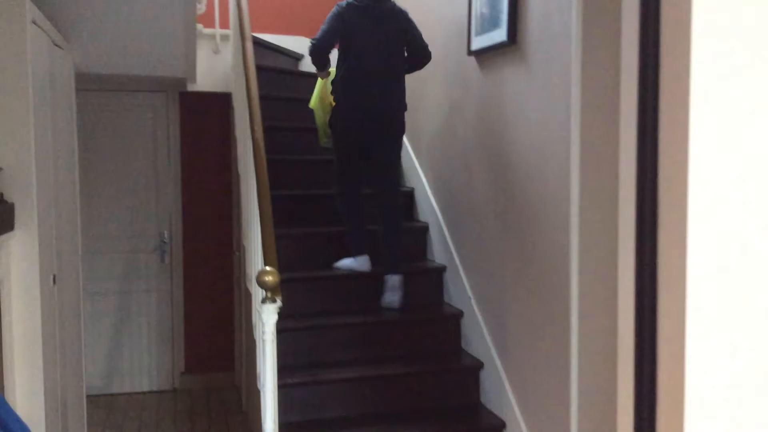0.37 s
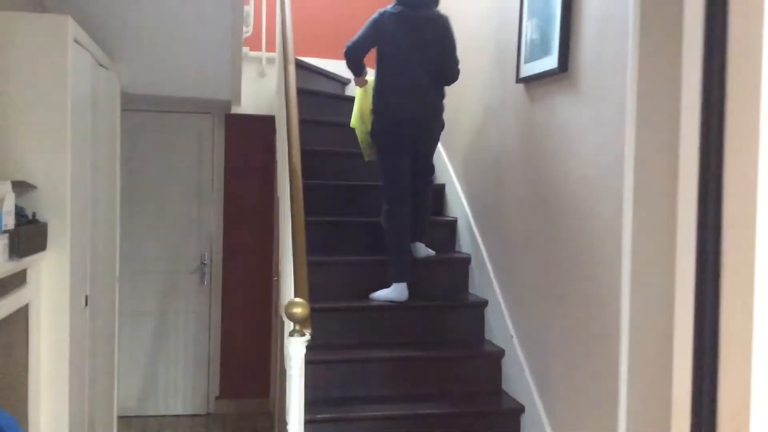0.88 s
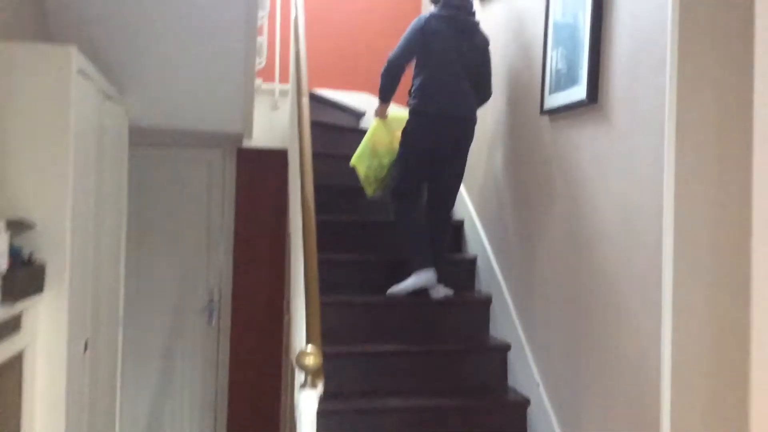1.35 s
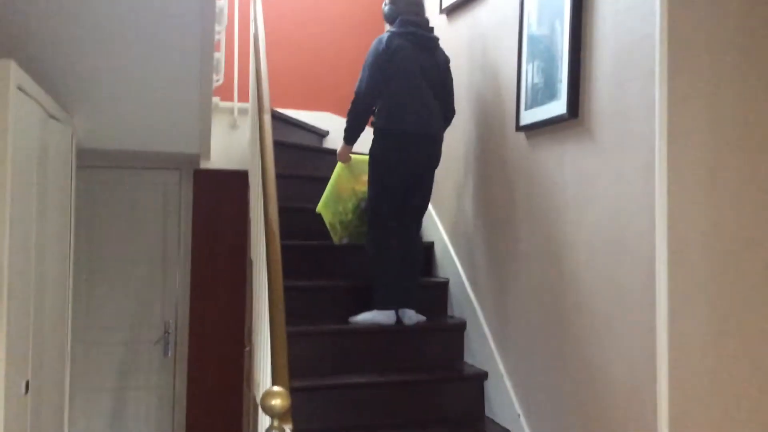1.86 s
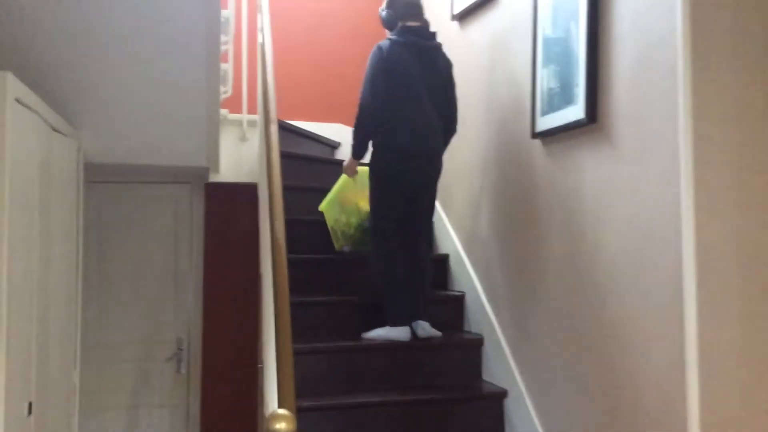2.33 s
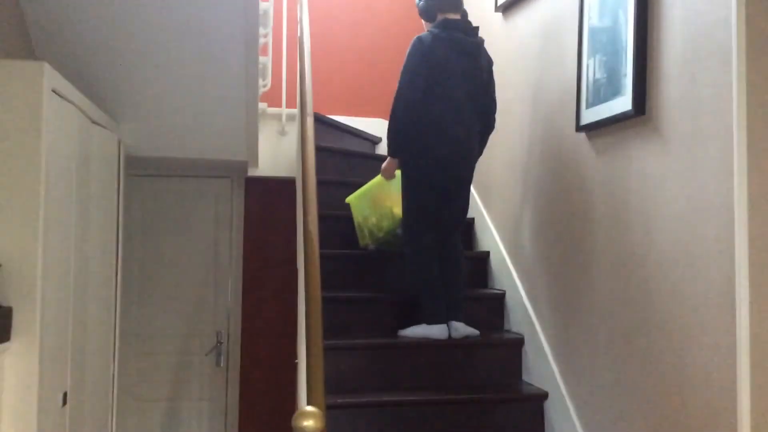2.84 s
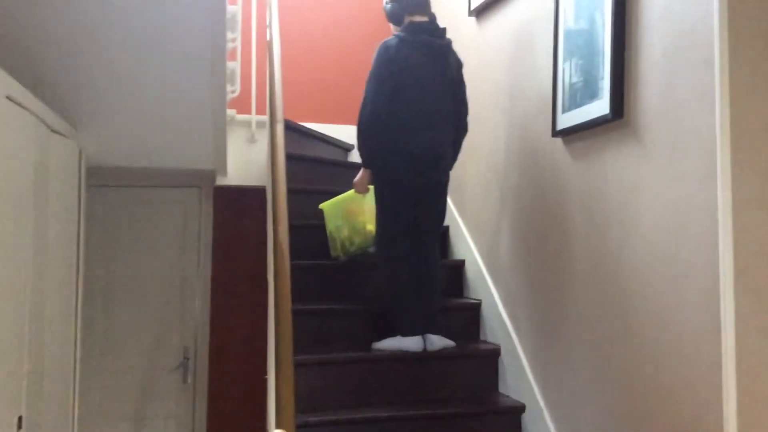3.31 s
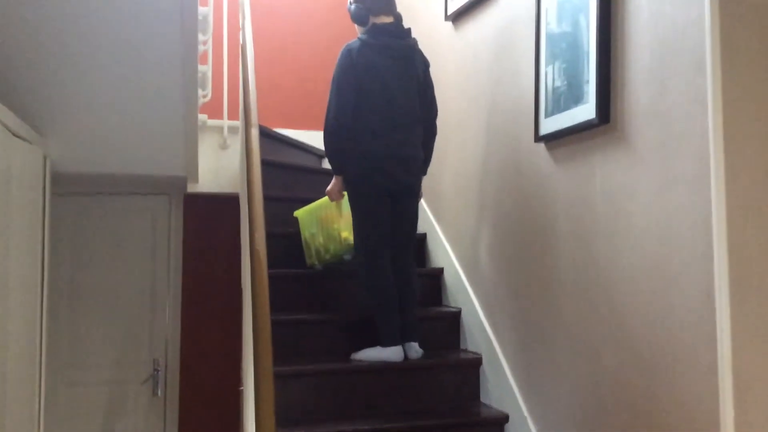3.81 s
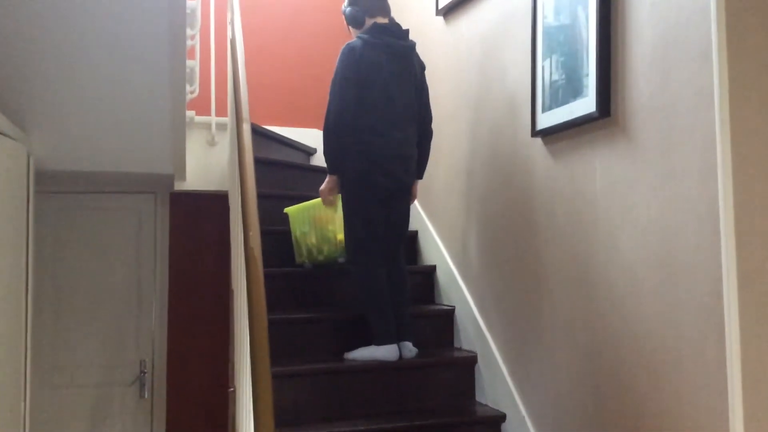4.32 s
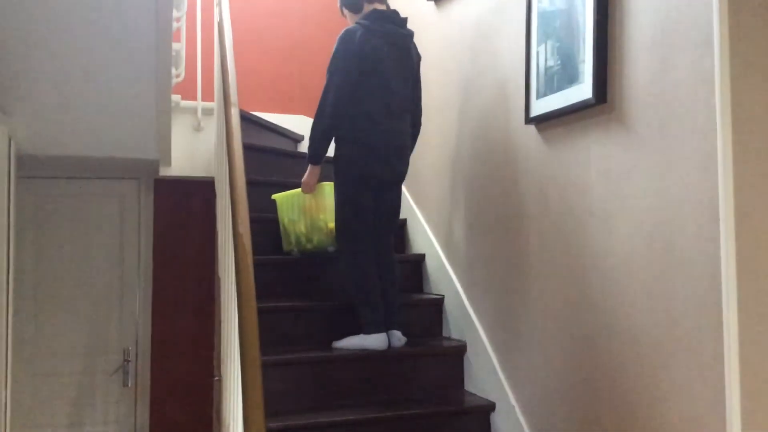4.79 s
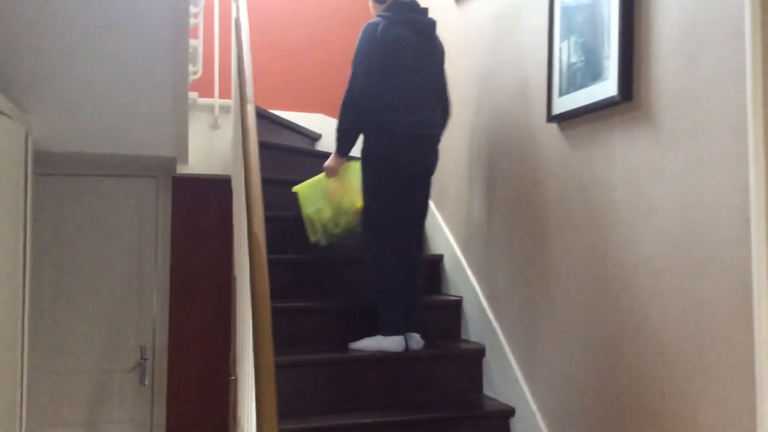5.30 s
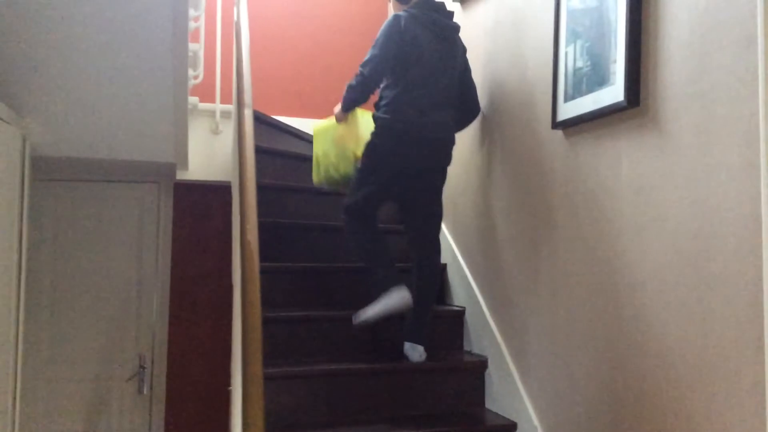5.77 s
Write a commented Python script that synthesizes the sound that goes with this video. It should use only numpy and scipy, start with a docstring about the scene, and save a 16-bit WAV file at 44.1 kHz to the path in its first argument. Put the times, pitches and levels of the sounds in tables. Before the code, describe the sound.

Socked feet thud dully on wooden stairs while a carried plastic crate booms, knocks and rattles, then long near-quiet broken by small faint knocks.

```python
"""A hard hallway with a boxed wooden staircase: someone in socks shifts about, a plastic crate in one hand.
Feet thud on the treads and the crate booms, knocks and ticks: noisy pushes ring banks of damped modes.
Its load rattles as sparse random taps on the same modes; cloth and socks scuff as coloured noise.
The blows ring the hallway for half a second, its tails about as strong as the direct sound;
a quiet hum, rumble and microphone hiss lie beneath, all heard on a handheld phone."""
import sys
import numpy as np
from scipy import signal
from scipy.fft import rfft, irfft
from scipy.io import wavfile
from scipy.ndimage import uniform_filter1d

SR = 44100
rng = np.random.default_rng(int(sys.argv[2]) if len(sys.argv) > 2 else 0)


def gain_from_decibels(decibels):
    """Convert decibel values to linear amplitude factors."""
    exponent = np.asarray(decibels, float) / 20
    return 10 ** exponent


def put_to_file(sound):
    """Save the sound as 16-bit audio at rate SR, in the file named by the first command-line argument."""
    columns = np.atleast_2d(sound).T  # one column per channel
    safe = np.clip(columns, -1, 1)
    whole_steps = np.round(safe * 32767)
    wavfile.write(sys.argv[1], SR, whole_steps.astype(np.int16))


N = 271521  # length in samples

# Room tone and microphone hiss, relative spectrum: f/Hz, level/dB
QUIET_SPECTRUM = [(47, -31), (80, -0.5), (162, 19), (247, -12.5), (449, -2), (1120, -22.5), (1580, -27.5),
                  (6300, -30.5), (8860, -12), (13000, -8.5)]
# Weight shifting on the floor, low swells: t/s of peak, level/dB at peak, rise/s, fall/s
FLOOR_SHIFTS = [(0.31, -52, .14, 0.081), (0.9, -61, 0.088, 0.31), (2.86, -58.5, 0.15, 0.26)]
# Reverberation of the hallway: f/Hz, t60/s
HALL_DECAY = [(100, 0.47), (300, 0.49), (1500, 0.46), (4000, 0.38), (10000, 0.33)]
# Reverberant over direct sound, before the reflections clump: f/Hz, level/dB
HALL_LEVEL = [(100, -1.5), (300, -2), (1500, -1), (5000, -1.5), (10000, -4.5)]
# Socks scuffing, relative spectrum: f/Hz, level/dB
SCUFF_SPECTRUM = [(1200, -44), (1900, -1), (4500, -4.5), (8000, -20)]
# Cloth brushing, relative spectrum: f/Hz, level/dB
BRUSH_SPECTRUM = [(3500, -5), (6000, -1.5), (9000, -1), (12000, -8.5), (15000, -35)]
# Cloth brushing past, a swell and a fade: t/s of peak, level/dB at peak, rise/s, fall/s
CLOTH_BRUSHES = [(0.25, -66.5, 0.1, 0.14), (0.5, -69.5, 0.14, 0.13), (1.13, -57.5, 0.041, 0.05),
                 (1.5, -41, 0.11, 0.13), (1.75, -52, 0.12, 0.22), (2.12, -59.5, 0.085, 0.12),
                 (3.87, -72, 0.22, 0.043), (4.08, -62, 0.022, 0.36), (4.4, -60.5, 0.06, 0.12),
                 (4.91, -54.5, 0.0091, 0.083), (5.5, -63.5, 0.4, 0.25), (5.68, -59, 0.22, 0.089),
                 (6.12, -59.5, 0.12, 0.12)]
# How hard the crate is shaken: t/s, level/dB of the load rattle
CRATE_SHAKE = [(0.0, -70.5), (0.36, -66.5), (0.81, -62), (1.0, -62.5), (1.13, -49.5), (1.25, -52.5),
               (1.41, -42.5), (1.58, -38), (1.75, -49), (2.09, -49), (2.3, -52), (2.42, -59.5),
               (2.61, -62.5), (2.83, -62), (2.97, -43.5), (3.21, -67), (3.45, -70), (3.8, -82.5),
               (4.1, -65.5), (4.24, -64), (4.73, -72), (4.96, -74), (5.08, -61.5), (5.31, -83),
               (5.56, -63.5), (5.68, -63), (5.95, -67.5), (6.04, -54.5), (6.16, -58)]
# Modes of the wooden tread: f/Hz, relative level/dB, nominal t60/s
TREAD_MODES = [(98, -24, 0.84), (120, -8, 0.34), (150.5, -1, 0.18), (168.4, 5.5, 0.07)]
# Modes of the hollow of crate and stair: f/Hz, relative level/dB, nominal t60/s
HOLLOW_MODES = [(216.5, -5, 0.14), (243, -5.5, 0.078), (271.6, 7, 0.076), (311.5, 3.5, 0.08),
                (351.4, 5, 0.073), (393, 2.5, 0.059)]
# Modes of the plastic walls: f/Hz, relative level/dB, nominal t60/s
WALL_MODES = [(541, 9, 0.014), (639, -0.5, 0.022), (704, -1, 0.037), (758, -2.5, 0.065), (820, -0.5, 0.031),
              (930, 6, 0.011), (1081, 7, 0.013), (1186, -9, 0.049), (1240, -1.5, 0.029), (1346.4, 4, 0.018),
              (1502, -3.5, 0.042), (1632, 3.5, 0.011), (1810, -13.5, 0.057)]
# Modes of the thin ribs, a dry crack with a little colour: f/Hz, relative level/dB, nominal t60/s
RIB_MODES = [(2370, 5.5, 0.0056), (2788, -4.5, 0.0089), (3370, -4, 0.0083), (3980, -1, 0.0058),
             (4600, -5.5, .009), (5300, 1.5, 0.003), (6470, 3.5, 0.0013), (8100, 9, 0.001),
             (9450, -7.5, 0.0042)]
# Dull blows on tread and hollow: t/s, boom peak level/dB, tread thud level/dB, boom pitch f/Hz, contact/ms
DULL_THUDS = [(0.267, -47, -56, 371, 17), (0.632, -41.5, -74, 213, 29), (0.657, -46, -58, 239, 19.5),
              (1.087, -43, -60, 275, 20), (1.128, -45, -50.5, 263, 22), (1.332, -41.5, -67, 271, 17),
              (1.41, -23, -49, 292, 22.2), (1.476, -23.5, -45.5, 265, 42), (1.533, -22.5, -45, 319, 25.7),
              (1.556, -31, -58, 300, 21.7), (1.586, -42, -49.5, 346, 8.5), (1.647, -29, -47, 288, 24.7),
              (1.714, -29, -62, 314, 32.4), (1.901, -35, -39.5, 317, 22.7), (2.029, -39, -56, 300, 12.5),
              (2.117, -46.5, -68, 297, 9.9), (2.242, -44, -75, 324, 23.6), (2.294, -41.5, -61.5, 378, 31),
              (2.453, -27, -35, 235, 4.6), (2.805, -30, -32, 312, 8.6), (2.919, -29.5, -37.5, 275, 18),
              (2.968, -37, -38.5, 310, 25.6), (4.144, -36.5, -38, 294, 21.3), (4.646, -56.5, -60, 272, 30),
              (4.909, -40, -46.5, 283, 12.6), (4.933, -39, -50, 303, 10.3), (5.152, -32.5, -46.5, 459, 18),
              (5.166, -36.5, -50, 240, 25.4), (5.914, -54.5, -52, 247, 24), (5.968, -41.5, -52, 219, 33),
              (6.002, -42.5, -41.5, 252, 24), (6.038, -38.5, -55, 237, 43)]
# Hard knocks of the plastic: t/s, knock peak level/dB, knock pitch f/Hz, tick level/dB, tick pitch f/Hz
HARD_KNOCKS = [(0.264, -47.5, 820, -56, 3300), (0.645, -33, 1420, -41.5, 5300),
               (0.668, -41, 1085, -51, 5300), (0.687, -44, 1370, -69, 2400), (0.726, -54, 1400, -57, 5300),
               (0.75, -55.5, 1280, -64, 5300), (1.408, -30.5, 1120, -28, 3230),
               (1.438, -33.5, 1110, -37.5, 2350), (1.478, -30, 893, -51, 2700),
               (1.534, -31, 610, -45, 2760), (1.752, -52, 1270, -43.5, 4600),
               (2.052, -45, 830, -43.5, 3650), (2.157, -67, 1500, -46, 4340), (2.242, -50, 1280, -61, 2400),
               (2.456, -35, 925, -46.5, 2420), (2.798, -19.5, 1366, -28, 2570),
               (2.801, -25.5, 730, -35.5, 4240), (2.866, -32, 1005, -49, 4200),
               (2.915, -30.5, 1420, -41.5, 3500), (2.933, -34, 1560, -50, 3500),
               (2.955, -43, 1520, -46.5, 6100), (2.974, -45, 1050, -51, 5460),
               (3.389, -61, 1344, -60, 2460), (4.076, -61, 860, -54, 3700), (4.147, -46.5, 1530, -52, 2400),
               (4.906, -40.5, 718, -49.5, 3100), (4.983, -46, 1300, -54, 2400),
               (4.992, -48.5, 1420, -65, 2400), (5.153, -37, 1350, -33, 9200),
               (5.158, -38, 1620, -46.5, 3770)]
# Soft sliding contacts, a rub rather than a blow: t/s, knock peak level/dB, f/Hz, tick level/dB, f/Hz
SOFT_RUBS = [(1.066, -41.5, 622, -79, 2570), (1.131, -42.5, 669, -55, 2580), (1.17, -50, 700, -75, 2780),
             (1.328, -37, 647, -41.5, 3900), (1.639, -34, 543, -43, 2530), (1.709, -38.5, 1672, -38, 4400),
             (2.016, -44.5, 654, -45, 3040), (2.24, -48, 554, -75, 3810), (3.41, -71, 1330, -57, 2480),
             (4.054, -63, 690, -69, 2730), (4.145, -40.5, 656, -53.5, 2470), (4.41, -55, 573, -60.5, 3520),
             (5.01, -49, 930, -69, 2700), (5.519, -60.5, 630, -72, 6300), (5.627, -45, 1343, -48, 2980),
             (5.971, -51, 724, -54, 3450), (6.02, -50, 545, -70, 3000)]


def level(x, db):
    """Scale to an rms level."""
    return x * gain_from_decibels(db) / np.sqrt(np.mean(x ** 2))


def curve(table):
    """Columns of a table at every sample."""
    s, *columns = np.transpose(table)
    return [np.interp(np.arange(N) / SR, s, c) for c in columns]


def shaped(points, size):
    """Noise coloured by (f/Hz, level/dB) points."""
    hz, db = np.transpose(points)
    axis = np.log(np.arange(size // 2 + 1) * SR / size + 1)
    spectrum = rfft(rng.standard_normal(size)) * gain_from_decibels(np.interp(axis, np.log(hz), db))
    return irfft(spectrum, size)


def walk(rate):
    """Random levels held 1 / rate s and slewed twice; spread near 1."""
    hold = int(SR / rate)
    steps = np.repeat(rng.standard_normal(N // hold + 1), hold)
    slewed = uniform_filter1d(uniform_filter1d(steps, hold), hold)
    return 1.3 * slewed[:N]


def swells(table):
    """Gain of events that climb 10 dB over the rise time and drop 10 dB over the fall time."""
    t = np.arange(N) / SR
    power = 0
    for s, db, rise_s, fall_s in table:
        distance = np.where(t < s, (s - t) / rise_s, (t - s) / fall_s)
        power = power + gain_from_decibels(db - 10 * distance) ** 2
    return np.sqrt(power)


def ring(x, modes, centre_hz=1., fall_db=0., widen=1):
    """Damped resonators; a mode's share falls by fall_db per octave squared away from centre_hz."""
    out = 0
    for hz, db, t60 in modes:
        # widen divides the decay time
        decay = np.log(1000) * widen / (np.clip(t60, .001, 1) * SR)
        pole = np.exp(2j * np.pi * hz / SR - decay)
        share = gain_from_decibels(db - fall_db * np.log2(hz / centre_hz) ** 2)
        out = out + share * signal.lfilter([1], [1, -pole], x).imag
    # a body radiates its acceleration, so little comes out below its lowest mode
    return signal.sosfilt(signal.butter(6, 0.83 * modes[0][0], "high", fs=SR, output="sos"), out)


def background():
    """Hiss, a wavering hum of narrow noise, and house rumble that swells as weight shifts on the floor."""
    hum_hz, width_hz = 152, 14
    hiss_db, hum_db, house_db = -66, -70, -71
    hiss = level(shaped(QUIET_SPECTRUM, size=N), hiss_db)
    hum_points = [(hum_hz - width_hz, -30), (hum_hz, 0), (hum_hz + width_hz, -30)]
    hum = level(shaped(hum_points, size=N), hum_db)
    rumble_points = [(22, -8.5), (40, -19.5), (55, -10.5), (75, -13.5), (110, -38), (200, -89)]
    rumble = level(shaped(rumble_points, size=N), 0)
    return hiss + hum + (gain_from_decibels(house_db) + swells(FLOOR_SHIFTS)) * rumble


def clatter(per_s, spread_db):
    """Sparse taps of very uneven size."""
    chance, size = rng.random((N, 2)).T
    return (chance < per_s / SR) * gain_from_decibels(-spread_db * np.log(1 - size)) * rng.standard_normal(N)


def handling():
    """The load tumbles against the hollow and the walls; socks scuff, cloth brushes."""
    rattle_db, = curve(CRATE_SHAKE)
    over_db = rattle_db + 60  # shaking over a reference rattle of -60 dB
    boom_db = -62.5 + 0.6 * over_db
    scuff_db = -66 + 1.11 * over_db
    crackle_db = rattle_db - 18  # thin plastic
    flutter = gain_from_decibels(2. * walk(70))  # jolts shake load and cloth together
    boom = level(ring(clatter(710, 0.94), HOLLOW_MODES, widen=0.74), boom_db)
    rattle = level(ring(flutter * clatter(2500, 1.0), WALL_MODES, widen=0.67), rattle_db)
    scuff = level(flutter * gain_from_decibels(0.8 * walk(150)) * shaped(SCUFF_SPECTRUM, size=N), scuff_db)
    # each crackle flexes one rib alone, so it has a pitch of its own
    crackle = level(sum(ring(clatter(250, 1.8), [rib], widen=0.42) for rib in RIB_MODES), crackle_db)
    cloth = swells(CLOTH_BRUSHES) * level(flutter * shaped(BRUSH_SPECTRUM, size=N), 0)
    return boom + rattle + crackle + scuff + cloth


def add(out, s, db, contact_ms, modes, centre_hz=0.5, fall_db=0., steady=0., span=None, order=1):
    """One push, swelling and fading over the contact time, rings a body at a given peak level."""
    # a faint noisy lead-in swells before each push and fades after
    lead_in_db, lead_in_ms = -8.5, 3.6
    lead = SR // 25  # room for the lead-in
    t = np.arange(-lead, SR // 6) / SR
    age = np.maximum(t, 0) * 1000 / np.clip(contact_ms, 1, 60)
    push = (4 * age * np.exp(1 - 4 * age)) ** order  # peak 1; a higher order sets in more gently
    lead_in = gain_from_decibels(lead_in_db) * np.exp(-np.abs(t) * 1000 / lead_in_ms)
    # grip and load bend the walls, so each blow rings a little off pitch
    bend = 1 + .015 * rng.standard_normal()
    bent_modes = [(hz * bend, g, t60) for hz, g, t60 in modes]
    # a rough contact pushes at random; a steady one chatters in step with the panel it drives
    force = rng.standard_normal(len(t)) + steady * np.cos(2 * np.pi * centre_hz * bend * t)
    if span:  # drive only from pitch / span to pitch * span
        band_hz = [centre_hz / span, centre_hz * span]
        force = signal.sosfilt(signal.butter(2, band_hz, "band", fs=SR, output="sos"), force)
    sound = ring(force * (push + lead_in), bent_modes, centre_hz, fall_db)
    loudest = np.sqrt(uniform_filter1d(sound ** 2, size=400).max())  # rms over 9 ms
    # the push sets in a little early, as it is heard once it has swollen
    start = int((s - order * contact_ms / 16000) * SR) - lead
    out[start:start + len(t)] += sound * gain_from_decibels(db - 3) / loudest  # a sine's rms is 3 dB under its peak


def blows():
    """Thuds ring the hollow and the tread; knocks and rubs ring the plastic walls and ribs."""
    tread_share, tick_share = 0.19, 0.91  # tread and ribs are pushed for a part of the contact only
    out = np.zeros(N + SR)
    for s, boom_db, thud_db, boom_hz, contact_ms in DULL_THUDS:
        add(out, s, boom_db, contact_ms, HOLLOW_MODES, boom_hz, fall_db=11, steady=0.21)
        add(out, s, thud_db, tread_share * contact_ms, TREAD_MODES, steady=0.38)
    # a knock is a brief contact, a rub a long one that sets in more gently
    for rows, contact_ms, order in (HARD_KNOCKS, 9, 1), (SOFT_RUBS, 48, 2):
        for s, knock_db, knock_hz, tick_db, tick_hz in rows:
            add(out, s, knock_db, contact_ms, WALL_MODES, knock_hz,
                fall_db=-0.5, steady=0.16, span=1.734, order=order)
            add(out, s, tick_db, tick_share * contact_ms, RIB_MODES, tick_hz, fall_db=13.5, order=order)
    return out[:N]


def hallway(source):
    """Direct sound plus dense tails, one per face, that fade at their own rate in each half octave."""
    sides = 2  # faces of crate and stair that each send their own sound into the hallway
    t = np.arange(SR) / SR
    t60_hz, t60_s = np.transpose(HALL_DECAY)
    wet_hz, wet_levels = np.transpose(HALL_LEVEL)
    out = source()
    for _ in range(sides):
        tail = 0
        for hz in 60 * 2 ** np.arange(0, 8, .5):
            band = shaped([(hz / 1.5, -40), (hz / 1.15, 0), (hz * 1.15, 0), (hz * 1.5, -40)], size=SR)
            t60 = np.interp(np.log(hz), np.log(t60_hz), t60_s)
            wet_db = np.interp(np.log(hz), np.log(wet_hz), wet_levels)
            build_up = np.clip((t - .002) / 0.0086, 0, 1)  # reflections build up after the nearest wall
            fade = gain_from_decibels(-60 * t / t60) * build_up
            tail = tail + gain_from_decibels(wet_db) * band * fade / np.sqrt(np.sum(fade ** 2))
        tail = tail * gain_from_decibels(3 * walk(120)[:SR])  # reflections arrive in clumps
        out = out + signal.fftconvolve(source(), tail)[:N] / np.sqrt(sides)
    return out


def scene():
    """Blows ring the hallway; handling and background fill the gaps."""
    return (background() + handling() + hallway(blows))[None]


def roll_off(x):
    """The treble ends steeply here."""
    return signal.sosfilt(signal.butter(12, 15630, fs=SR, output="sos"), x)


def record(dry):
    """A handheld phone: the microphone capsule loses the deepest bass and the top octave."""
    low_hz, top_hz = 46, 11100
    no_bass = signal.sosfilt(signal.butter(2, low_hz, "high", fs=SR, output="sos"), dry)
    capsule = signal.sosfilt(signal.butter(5, top_hz, fs=SR, output="sos"), no_bass)
    return roll_off(capsule)


dry = scene()
out = record(dry)
put_to_file(out)
```